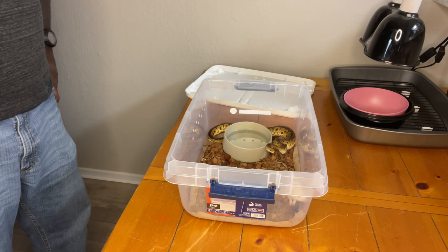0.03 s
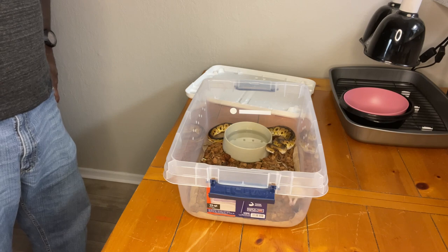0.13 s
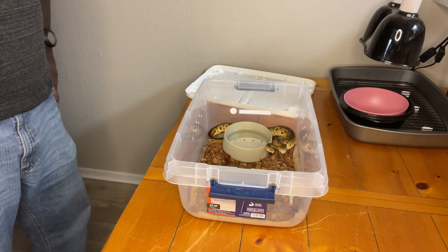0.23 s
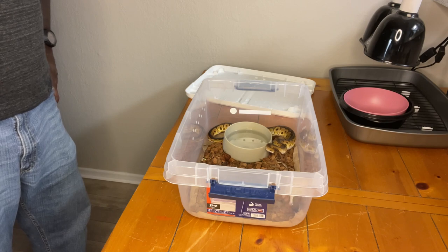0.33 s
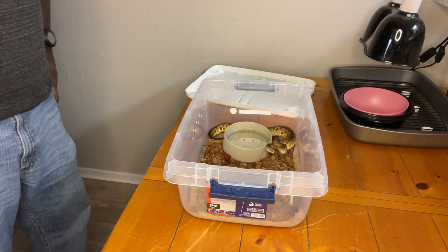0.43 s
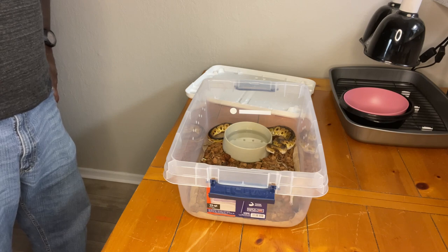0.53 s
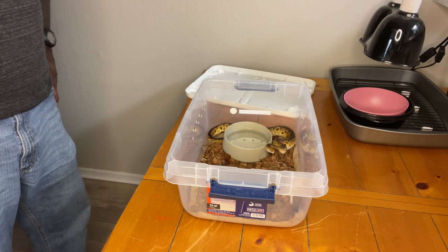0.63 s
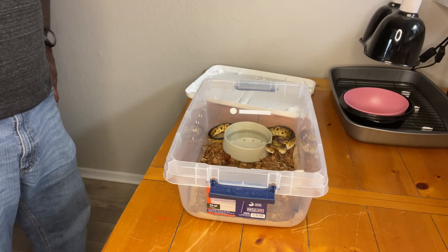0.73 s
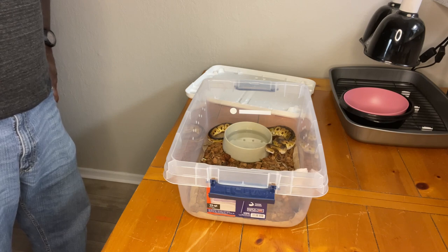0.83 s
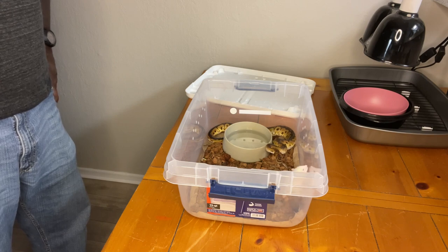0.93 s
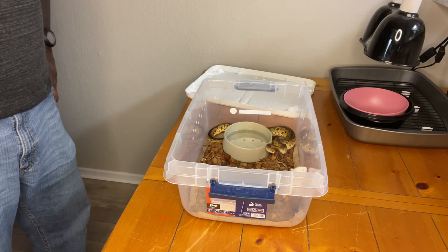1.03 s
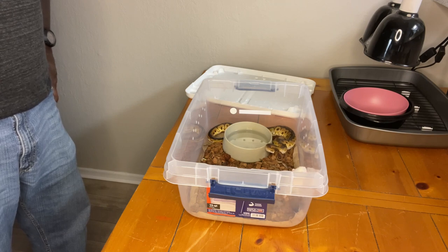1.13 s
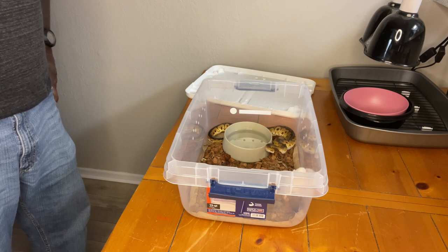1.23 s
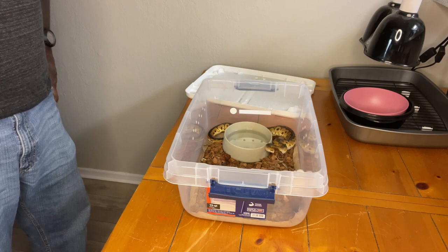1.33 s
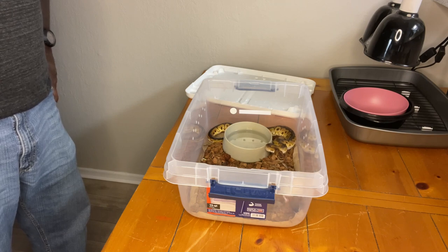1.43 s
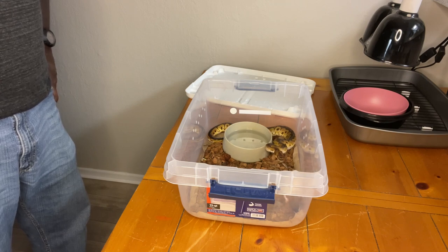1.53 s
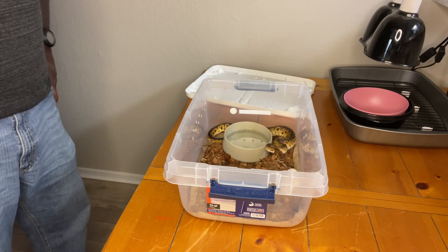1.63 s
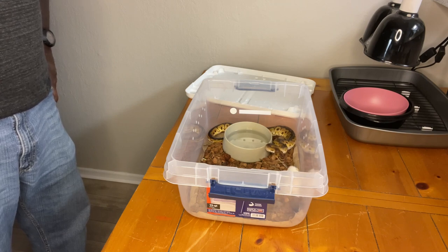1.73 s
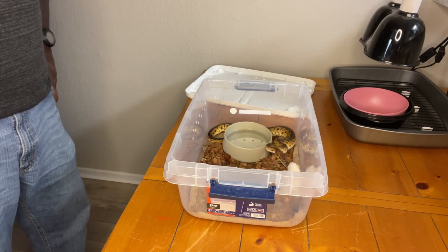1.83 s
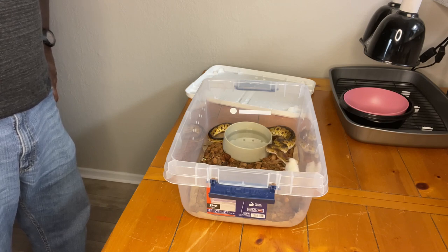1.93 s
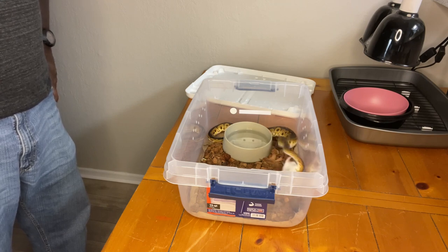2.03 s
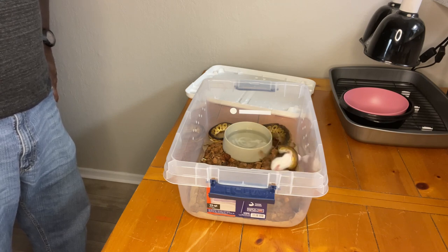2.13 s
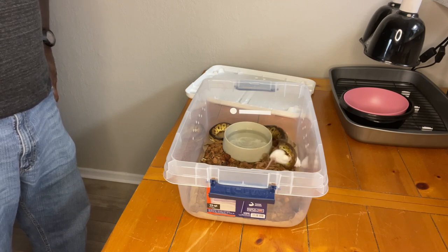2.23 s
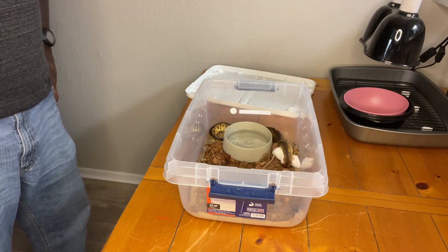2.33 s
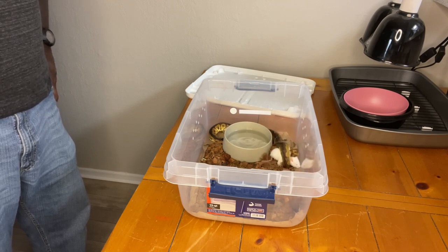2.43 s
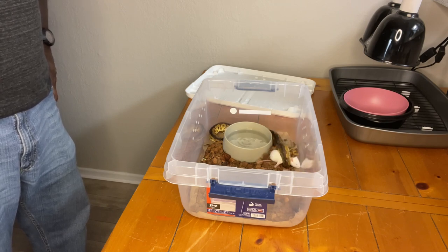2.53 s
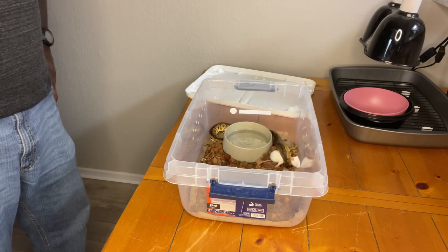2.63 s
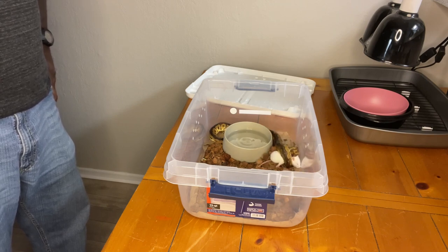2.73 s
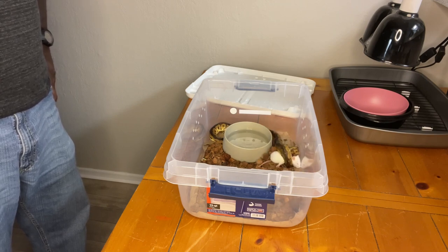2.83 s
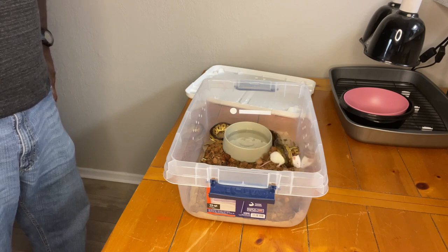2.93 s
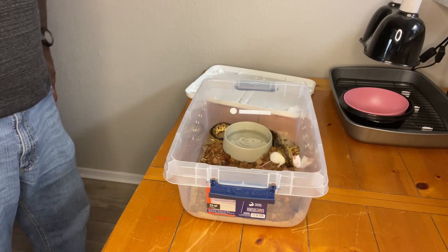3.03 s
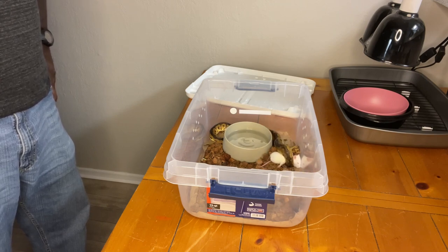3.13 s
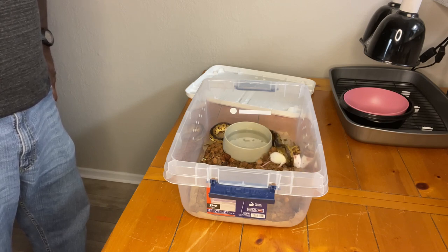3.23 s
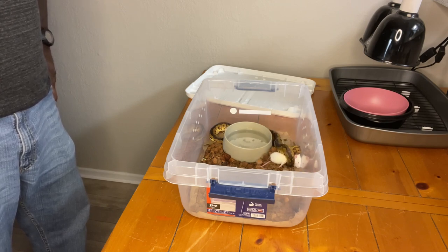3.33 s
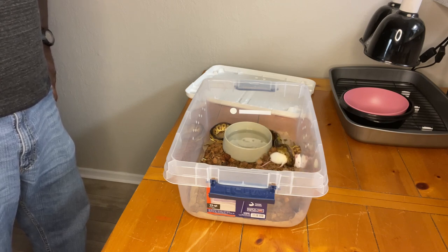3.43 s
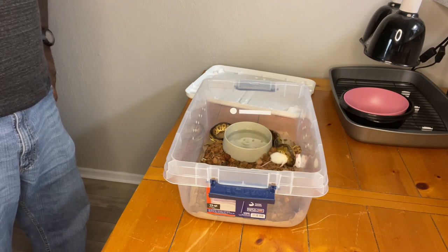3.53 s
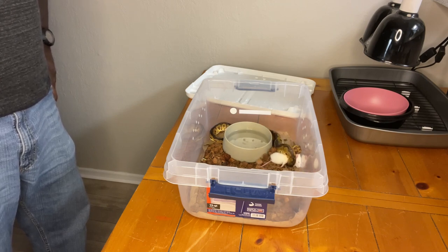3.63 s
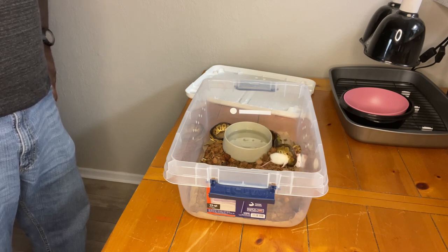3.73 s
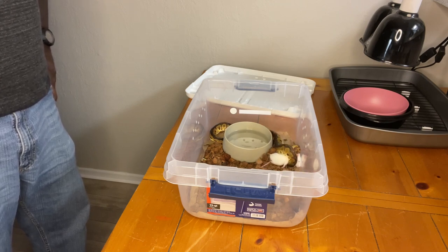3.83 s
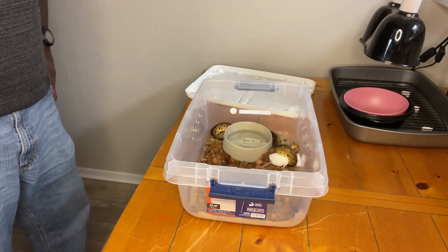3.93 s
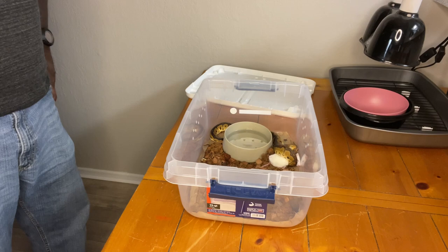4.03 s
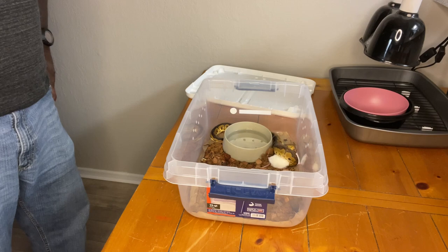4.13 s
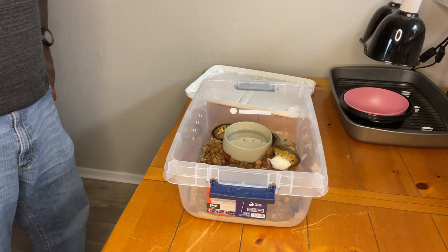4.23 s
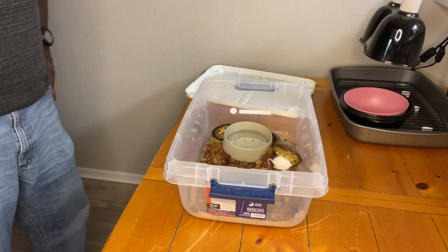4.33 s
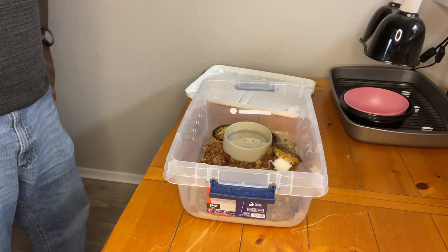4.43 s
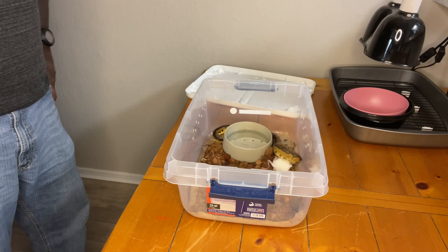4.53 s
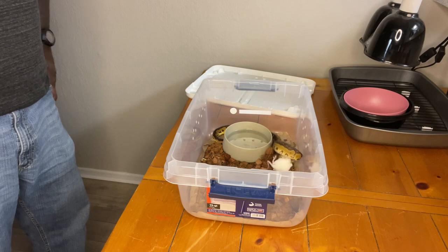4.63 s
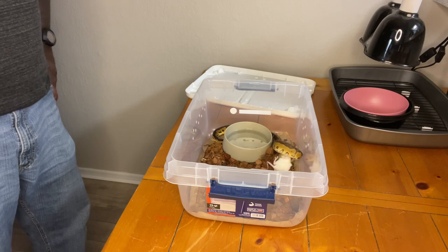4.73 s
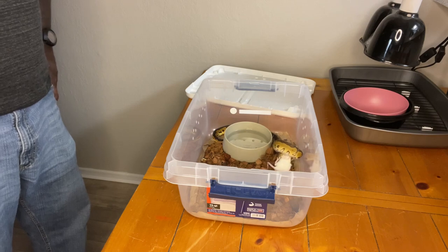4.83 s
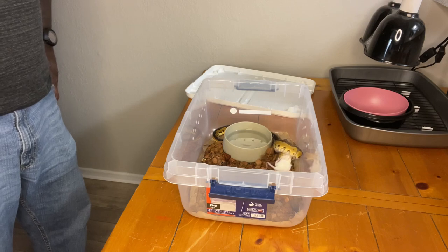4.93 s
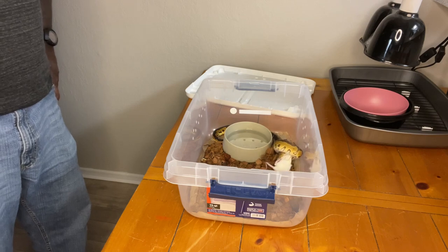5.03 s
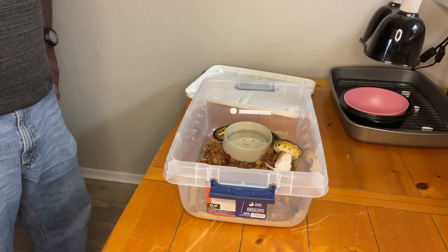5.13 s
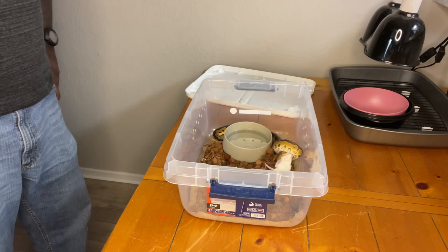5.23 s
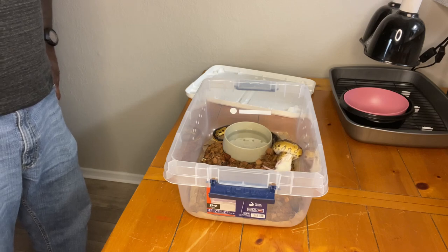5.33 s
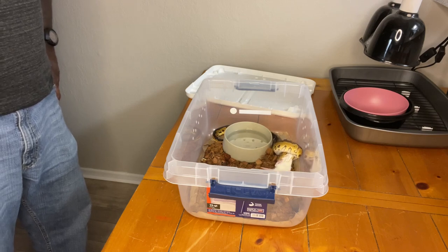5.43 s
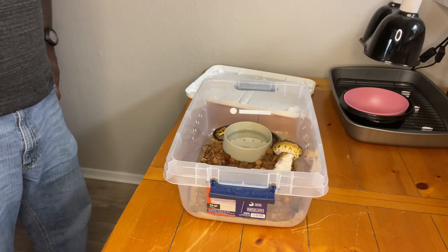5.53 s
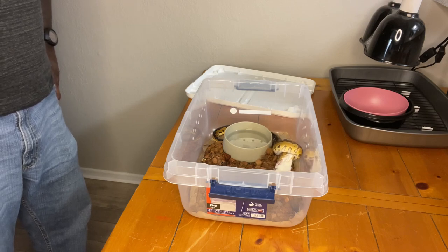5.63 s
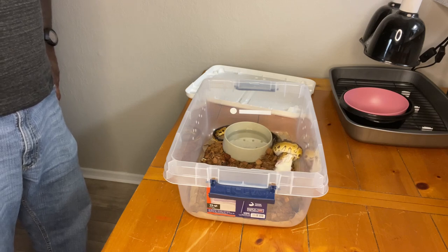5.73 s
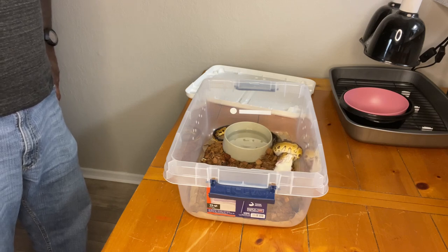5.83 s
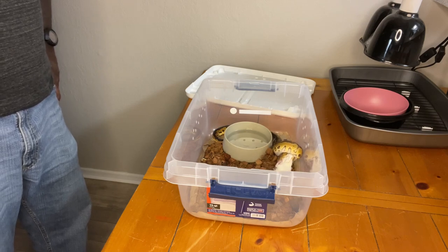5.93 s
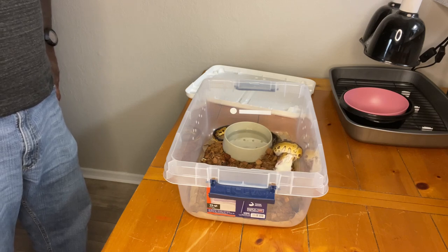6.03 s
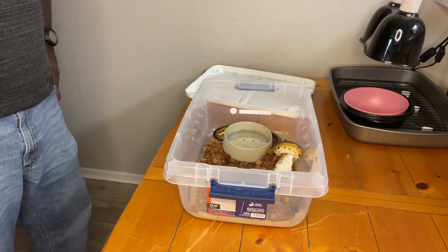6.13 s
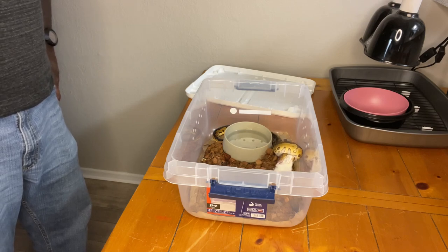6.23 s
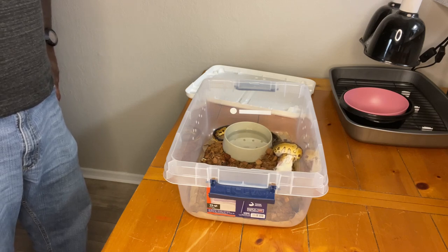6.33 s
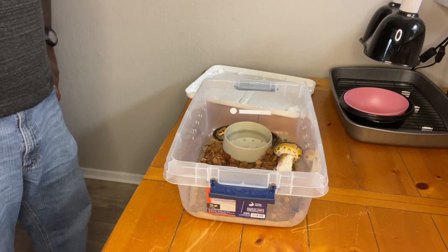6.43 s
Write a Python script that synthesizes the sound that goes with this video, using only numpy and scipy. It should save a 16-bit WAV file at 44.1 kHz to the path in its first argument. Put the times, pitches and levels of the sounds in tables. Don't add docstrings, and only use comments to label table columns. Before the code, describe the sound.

A snake stirs bark chips softly, then strikes: a quick cluster of low plastic thumps and a burst of crackling bedding. A young rodent answers with a swelling raspy squeal and a short sharp one. After a pause of rustling and a sharp snap come four more squeals, the first loudest, the rest weakening. Close stereo pickup, short room reverberation, low rumble and faint hiss.

```python
import sys
import numpy as np
from scipy import signal
from scipy.fft import rfft, irfft, next_fast_len
from scipy.io import wavfile

SR = 44100
rng = np.random.default_rng(int(sys.argv[2]) if len(sys.argv) > 2 else 0)


def bounce(signal):
    frames = np.transpose(np.atleast_2d(signal))
    limited = np.clip(frames, -1, 1)
    pcm = np.round(limited * 32767).astype(np.int16)
    wavfile.write(sys.argv[1], SR, pcm)


def attenuation_scalar(level_db):
    decades = np.asarray(level_db, float) / 20
    return 10 ** decades


N = 286341
TIME = np.arange(N) / SR
PADDED = next_fast_len(N + 4096)
HZ = np.maximum(np.fft.rfftfreq(PADDED, 1 / SR), 10)


def rms_one(x):
    return x / np.sqrt(np.mean(x ** 2) + 1e-20)


def in_time(rows):
    s, *columns = np.transpose(rows)
    return [np.interp(TIME, s, c) for c in columns]


def at_hz(points, hz, column=1):
    points = np.array(points)
    return np.interp(np.log(hz), np.log(points[:, 0]), points[:, column])


def shaped(x, gains):
    return irfft(rfft(x, PADDED) * gains, PADDED)[..., :N]


def colour(x, spectrum):
    return shaped(x, attenuation_scalar(at_hz(spectrum, HZ)))


def band_pass(x, low, high):
    return signal.sosfilt(signal.butter(2, [low, high], "band", fs=SR, output="sos"), x)


def high_pass(x, hz, order=2):
    return signal.sosfilt(signal.butter(order, hz, "high", fs=SR, output="sos"), x)


def drift(rate):
    r = np.exp(-2 * np.pi * rate / SR)
    noise = rng.standard_normal(N + SR)
    return rms_one(signal.lfilter([1], [1, -2 * r, r * r], noise)[SR:])


def ring(clicks, hz, t60):
    r, w = attenuation_scalar(-60 / (t60 * SR)), 2 * np.pi * hz / SR
    return signal.lfilter([0, np.sin(w)], [1, -2 * r * np.cos(w), r * r], clicks + 1e-18)


# time in seconds, effort in dB, mouth opening
# as the level above about 10 kHz in dB.
SQUEALS = [
    [(2.085, -49, -4.5), (2.177, -37, -6), (2.263, -33.5, 0), (2.32, -38.5, 3), (2.384, -37, 11.5),
     (2.44, -39.5, -8)],
    [(2.585, -40, -5), (2.605, -42.5, 7), (2.639, -31.5, -4.5), (2.7, -40, -6)],
    [(4.652, -39.5, -29.5), (4.672, -29.5, -1.5), (4.705, -26, 6), (4.735, -32.5, 3.5), (4.85, -31, 9),
     (4.875, -33.5, -2.5), (4.905, -36.5, -28)],
    [(5.125, -47, 2), (5.139, -32.5, 8), (5.175, -36.5, -1.5), (5.235, -38.5, 2), (5.345, -41.5, 0.5)],
    [(5.578, -49, 5), (5.598, -39.5, -3.5), (5.67, -46, 2.5), (5.69, -61, -8)],
    [(5.933, -63, 1.5), (5.941, -50, 1.5), (5.95, -65, -22), (5.98, -65, -15.5)],
]
# time in seconds, pitch in Hz, hoarseness as breath in dB re tone.
FOLDS = [
    [(2.085, 2150, 0), (2.12, 2340, 1), (2.23, 2420, 3), (2.32, 2400, 3), (2.345, 2260, -11),
     (2.425, 2080, -14), (2.44, 2070, 2)],
    [(2.585, 2860, 2), (2.6, 2800, -5), (2.65, 2520, -6), (2.67, 2390, 7), (2.7, 2300, 4)],
    [(4.652, 3230, 2), (4.68, 3190, -2), (4.712, 3100, -2), (4.728, 2810, -1), (4.785, 2790, -4),
     (4.815, 2580, -8), (4.865, 2490, -8), (4.88, 2480, 2)],
    [(5.125, 2360, 3), (5.152, 2440, 3), (5.165, 2635, -15), (5.207, 2630, -15), (5.216, 2520, -16),
     (5.235, 2500, -14), (5.26, 2450, 0), (5.35, 2380, 7)],
    [(5.578, 3165, 12), (5.69, 3000, 11)],
    [(5.93, 2960, 6), (5.98, 2830, 2)],
]
# frequency in Hz, level in dB.
THROAT = [(900, -25), (1500, -19), (2500, -17), (3200, -17.5), (3800, -13.5), (4700, -11), (5600, -4.5),
          (6900, -7.5), (8000, -4), (9200, -14), (10500, -12.5), (12000, -16.5), (13400, -14), (15800, -17)]


def squeals(tremor, jitter, flicker_db):
    pitch, breath_db = in_time(np.concatenate(FOLDS))
    effort_db, teeth_db = in_time(np.concatenate(SQUEALS))
    half_db = -7 + 1.8 * breath_db
    chest_db, palate_db = 1.7 + 0.06 * breath_db, -3.2 + 0.14 * breath_db
    zone_edges = [4000, 6500, 9600]      # Hz, chest / throat / palate / teeth
    zones_db = [chest_db, 0 * pitch, palate_db, teeth_db]
    voiced = np.zeros(N)
    for rows in SQUEALS:
        onset = np.clip((TIME - rows[0][0]) / 0.002, 0, 1)
        voiced += onset * np.clip((rows[-1][0] - TIME) / 0.0049, 0, 1)

    trembling = np.sin(2 * np.pi * np.cumsum(75 * attenuation_scalar(1.5 * drift(20))) / SR)
    shaken = pitch * (1 + tremor * trembling + jitter * attenuation_scalar(breath_db) * drift(400))
    phase = np.pi * np.cumsum(shaken) / SR
    flickers = [drift(36) for _ in range(5)]
    rasp = rms_one(1.1 + drift(90))
    tone, power = np.zeros(N), 1e-12
    for k in range(1, 16):
        line_hz = k * pitch / 2
        shape_db = np.choose(np.digitize(line_hz, zone_edges), zones_db)
        gain = attenuation_scalar(at_hz(THROAT, line_hz) + shape_db + half_db * (k % 2)) * (line_hz < 17000)
        unsteady = attenuation_scalar(flicker_db * flickers[k % 5]) * (rasp if k % 2 else 1)
        tone += gain * unsteady * np.sin(k * phase + k * k) * np.sqrt(2)
        power = power + gain ** 2

    puffs = rng.standard_normal(N) * (1.2 + np.sin(2 * phase)) * attenuation_scalar(1.5 * drift(150))
    notch = signal.butter(2, [2600, 4300], "bandstop", fs=SR, output="sos")
    hollow = signal.sosfilt(notch, high_pass(puffs, 4000, order=1))
    airy, zone = rms_one(colour(hollow, THROAT)), np.digitize(HZ, zone_edges)
    breath = sum(shaped(airy, zone == z) * attenuation_scalar(db) for z, db in enumerate(zones_db))
    share = attenuation_scalar(breath_db)
    return voiced * attenuation_scalar(effort_db) * (tone / np.sqrt(power) + share * breath) / np.sqrt(1 + share ** 2)


# time in seconds, level in dB.
STRIKE = [
    (2.001, -26),
    (2.0045, -22),
    (2.015, -28),
    (2.041, -39.5),
    (2.428, -66.5),
    (4.301, -65.5),
    (5.14, -72),
    (5.449, -68),
]
# frequency in Hz, level in dB, t60 in seconds.
TUB = [(73.5, -18.5, 0.067), (146, 0.5, 0.18), (163.3, 1.5, 0.051), (247, -20.5, 0.099),
       (277, -14.5, 0.089), (413.7, -0.5, 0.16), (480.4, -3.5, 0.051), (547.5, -17.5, 0.18),
       (614, -15.5, 0.16), (754, 0, 0.018), (844, -16, 0.097), (920, -24, 0.038)]


def thumps():
    out = np.zeros(N)
    at = [round(s * SR) for s, _ in STRIKE]
    blow_db = np.array(STRIKE)[:, 1]
    chances = rng.standard_normal((len(TUB), len(STRIKE)))
    for k, ((hz, level_db, t60), chance) in enumerate(zip(TUB, chances)):
        clicks = np.zeros(N)
        clicks[at] = attenuation_scalar(blow_db + level_db + 2.5 * chance) * (-1) ** k
        out += ring(clicks, hz, t60)
    return signal.sosfilt(signal.butter(4, 950, fs=SR, output="sos"), out)


# time in seconds, peak in dB, ring in Hz, scatter after it in dB re peak.
SNAPS = [(0.063, -76, 4320, -17), (0.2553, -67, 5750, -20), (0.378, -59.5, 4450, -19),
         (0.5994, -70, 9900, -25), (0.9584, -67.5, 11700, -19), (1.0635, -74, 4010, -15),
         (1.1985, -63.5, 10000, -4.5), (1.535, -48.5, 4390, -16.5), (1.688, -69, 9800, -34),
         (1.7, -58, 4660, -5), (1.92, -52, 4200, -29), (1.9604, -51, 10430, -44), (1.9773, -50, 4560, -38),
         (2.038, -29.5, 11800, -21.5), (2.4337, -35, 4960, -19.5), (3.034, -66, 11440, -23),
         (3.1208, -64.5, 10130, -24), (3.216, -63.5, 12600, -16), (3.5263, -67.5, 10500, -12.5),
         (3.626, -67.5, 10700, -21), (3.7324, -58, 13000, -22), (3.85, -59, 11200, -20),
         (3.9426, -57.5, 5030, -6.5), (3.9703, -56, 11500, -16), (4.0454, -49.5, 5500, -10),
         (4.1617, -28, 5070, -18), (4.3337, -47.5, 6400, -9), (4.4654, -52, 11500, -47),
         (5.9156, -58, 6300, -17), (6.1126, -68, 10900, -28)]


def snaps():
    out, age = np.zeros(N), np.arange(260) / SR
    for s, peak_db, hz, _ in SNAPS:
        ringing = np.exp(-age / .00008) * np.cos(2 * np.pi * hz * age)
        grit = .15 * np.exp(-age / .001) * rng.standard_normal(260)
        first = round(s * SR)
        out[first:first + 260] += attenuation_scalar(peak_db + 11.0) * (ringing + grit)
    return high_pass(out, 3000)


def scatter():
    s, peak_db, _, scatter_db = np.transpose(SNAPS)[..., None]
    age = TIME - s
    return np.sum(attenuation_scalar(peak_db + scatter_db - 60 * np.abs(age) / 0.17) * (age > 0), axis=0)


# start in seconds, length in seconds, rustle in dB, tub rumble in dB re rustle.
DRAGS = [(0.18, 0.44, -102.5, 9), (1.19, 0.041, -85, -5), (1.306, 0.068, -70, -28),
         (1.457, 0.034, -77, -19), (1.551, 0.062, -63.5, -16), (1.704, 0.022, -85.5, -2.5),
         (1.867, 0.066, -74, -9), (3.12, 0.19, -96, -20), (3.398, 0.29, -91, 2.5), (3.718, 0.3, -81, 3.5),
         (3.959, 0.34, -75, -4), (4.172, 0.2, -61, -10), (4.455, 0.39, -76.5, -8.5),
         (5.435, 0.3, -83.5, -12), (6.25, 0.2, -97.5, 17.5)]


def drags():
    rise, fall = 612, 300
    settling_db, settling_rumble_db = -92, -83
    start, length, rustle_db, rumble_db = np.transpose(DRAGS)[..., None]
    off_db = rise * np.maximum(start - TIME, 0) + fall * np.maximum(TIME - start - length, 0)
    slides = attenuation_scalar(rustle_db - np.minimum(off_db, 200))
    rumble = np.sum(slides * attenuation_scalar(rumble_db), axis=0)
    return attenuation_scalar(settling_db) + slides.sum(axis=0), attenuation_scalar(settling_rumble_db) + rumble


# time in seconds, level in dB.
LUNGE = [(1.955, -73.5), (1.975, -64), (1.98, -46.5), (2.03, -48.5), (2.04, -44), (2.052, -47.5),
         (2.1, -53.5), (2.3, -59), (2.5, -74.5)]
# frequency in Hz, density in dB per Hz.
RUSTLE = [(530, -36), (900, -7), (1810, -2), (2890, -1), (4860, -2.5), (6480, -4), (7960, -2),
          (11400, -9.5), (14500, -10.5), (16000, -21)]


def bedding():
    rustle, rumble = drags()
    lunge_db, = in_time(LUNGE)
    thrown = attenuation_scalar(lunge_db) * (TIME > LUNGE[0][0]) * (TIME < LUNGE[-1][0])
    level = rustle * attenuation_scalar(4.1 * drift(27)) + scatter() + thrown
    falls = rng.random(N) < 2500 * attenuation_scalar(4 * drift(25)) / SR
    grains = attenuation_scalar(np.minimum(rng.exponential(1, N), 5)) * falls
    rub = rms_one(grains * rng.choice([-1, 1], N)) + 0.46 * rng.standard_normal(N)
    floor = rms_one(band_pass(rng.standard_normal(N), 120, 700))
    return level * rms_one(colour(rub, RUSTLE)) + rumble * attenuation_scalar(5.7 * drift(4.0) - 7.5) * floor


# frequency in Hz, phase the right leads by in rad, likeness of the room air from 0 to 1.
PORTS = [(29, 0, 1), (290, .5, .2), (1000, .9, 0), (2950, 1.9, .1), (3600, 3.4, .1), (4600, 4.4, .2),
         (6800, 4.5, .4), (8000, 2.9, .3), (9000, 2.0, .3), (11500, 0, .6), (13300, -.3, .6),
         (15800, -2.2, .5)]


def ports(x):
    turn = np.exp(.5j * at_hz(PORTS, HZ))
    return shaped(x, np.array([1 / turn, turn]))


def diffuse(white):
    alike = np.clip(at_hz(PORTS, HZ, column=2), 0, 1)
    return ports(shaped(white[0], np.sqrt(alike))) + shaped(white[1:], np.sqrt(1 - alike))


# frequency in Hz, t60 in seconds.
ROOM = [(100, 0.82), (1000, 0.44), (5000, 0.37), (15000, 0.25)]


def room(x):
    noise = diffuse(rng.standard_normal((3, N)))[:, :SR]
    edges, echoes = 60 * 2. ** np.arange(9), 0
    tops = edges[1:] * [0.87, 1.2, 1.1, 0.67, 0.65, 0.63, 0.91, 1.3]
    for low, high in zip(edges, tops):
        t60 = at_hz(ROOM, np.sqrt(low * high))
        echoes = echoes + band_pass(noise, low, high) * attenuation_scalar(-60 * TIME[:SR] / t60)
    echoes = echoes * np.clip(TIME[:SR] / 0.006, 0, 1)
    echoes = echoes / np.sqrt(np.sum(echoes ** 2) / 2)
    return signal.fftconvolve(x[None], echoes, axes=1)[:, :N]


# frequency in Hz, level in dB.
AIR = [(12, -30), (20, -11), (55, -1.5), (91, -11), (110, -20.5), (337, -33.5), (410, -29), (574, -38.5),
       (949, -40.5), (4060, -45.5), (6910, -55), (13500, -46), (16000, -67)]


def air():
    hush = rms_one(colour(diffuse(rng.standard_normal((3, N))), AIR))
    hiss = high_pass(hush, 130)
    rumble = (hush - hiss) * attenuation_scalar(2.2 * drift(4))
    return attenuation_scalar(-65) * (hiss + rumble) * attenuation_scalar([[1.1], [-1.1]])


def scene():
    voice = squeals(tremor=0.012, jitter=.021, flicker_db=4.0)
    bark, blows = bedding() + snaps(), thumps()
    direct = attenuation_scalar(2.0) * ports(voice + bark + blows) * attenuation_scalar([[.4], [-.4]])
    wet = attenuation_scalar(-7) * voice + attenuation_scalar(-4) * bark + attenuation_scalar(-9) * blows
    return direct + room(wet) + air()


def low_pass(x):
    return signal.sosfilt(signal.butter(12, 16470, fs=SR, output="sos"), x)


def record(dry):
    top_cut = signal.cheby2(10, 60, 16300, fs=SR, output="sos")
    return low_pass(signal.sosfilt(top_cut, dry))


dry = scene()
out = record(dry)
bounce(out)
```